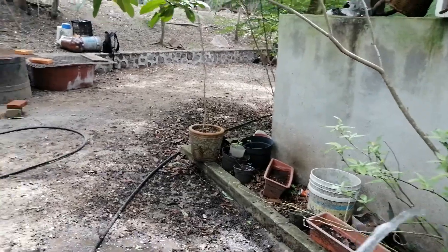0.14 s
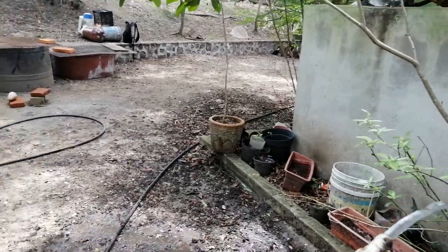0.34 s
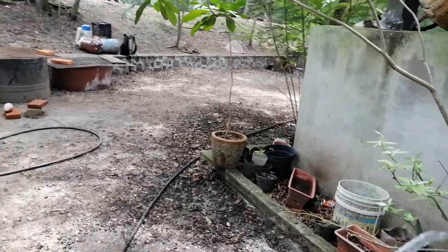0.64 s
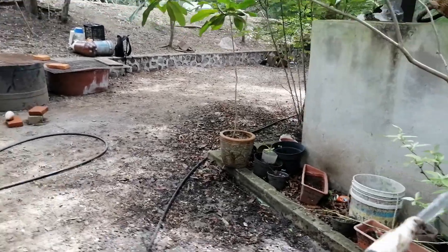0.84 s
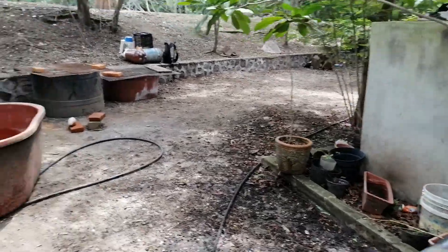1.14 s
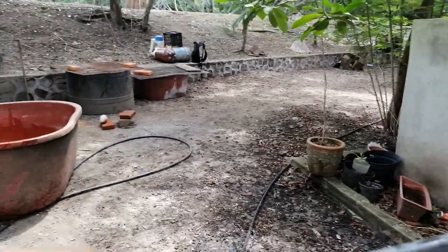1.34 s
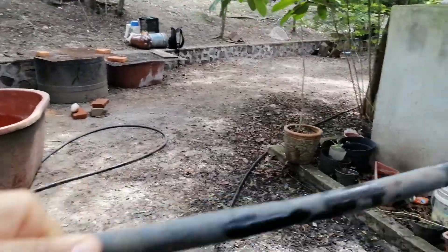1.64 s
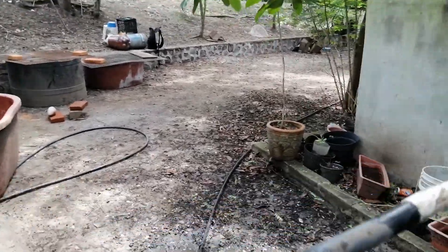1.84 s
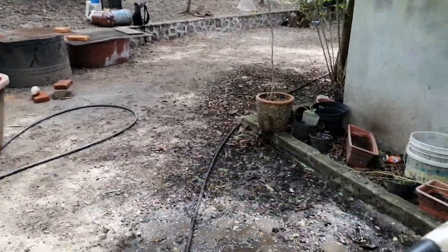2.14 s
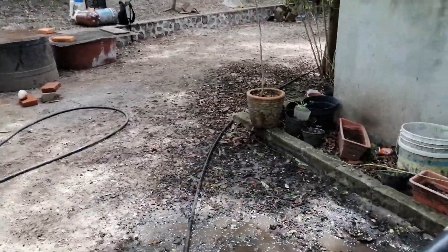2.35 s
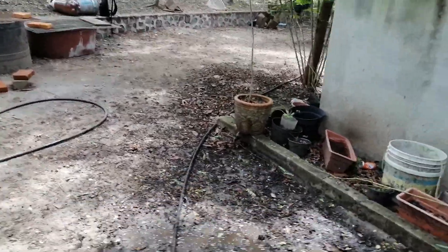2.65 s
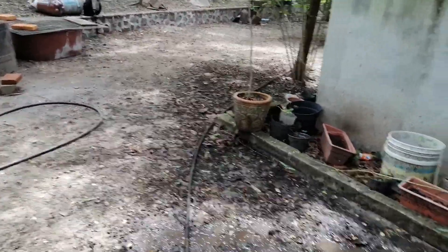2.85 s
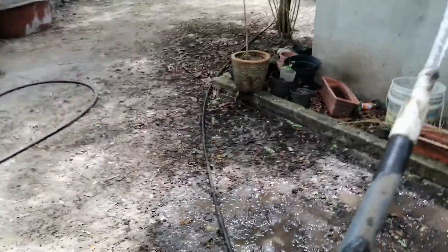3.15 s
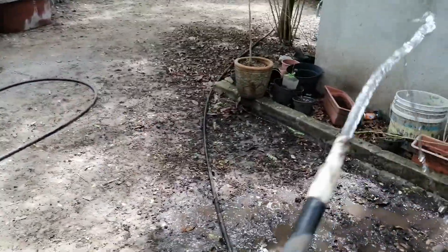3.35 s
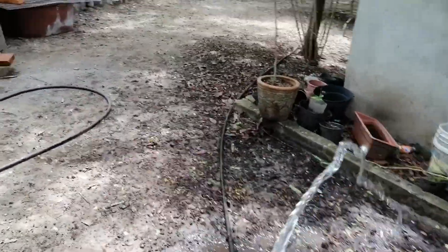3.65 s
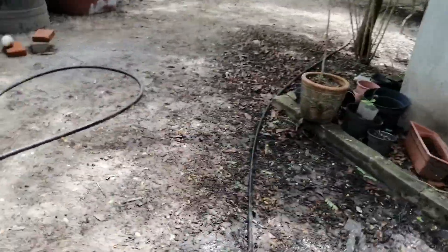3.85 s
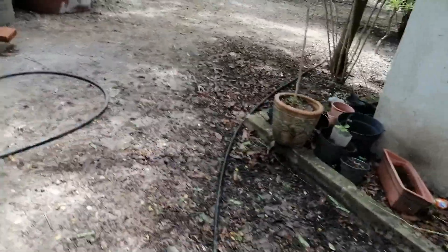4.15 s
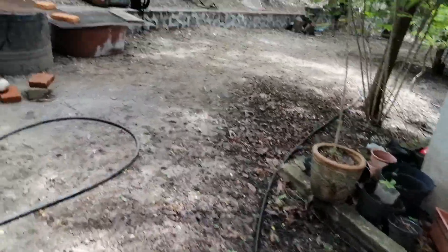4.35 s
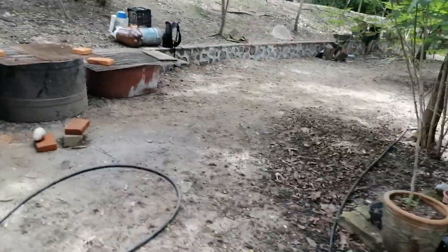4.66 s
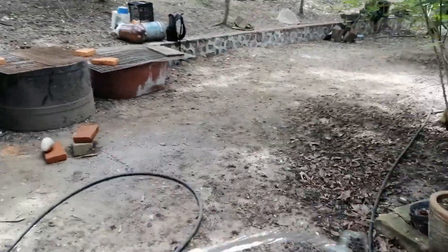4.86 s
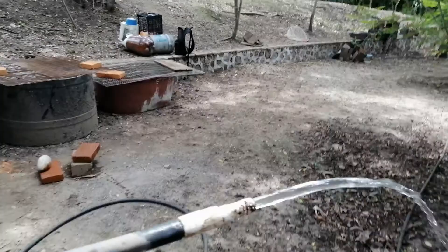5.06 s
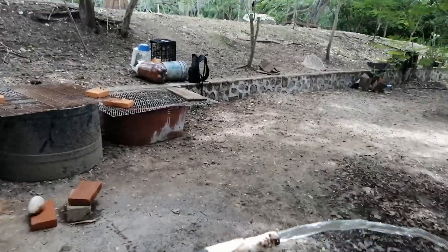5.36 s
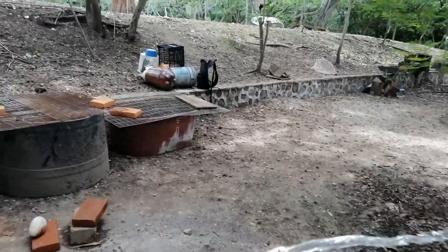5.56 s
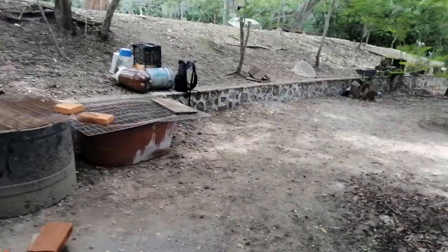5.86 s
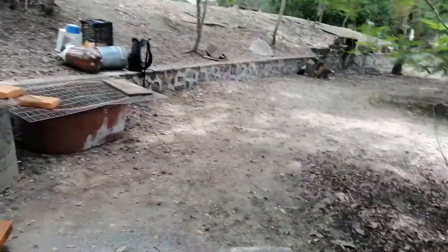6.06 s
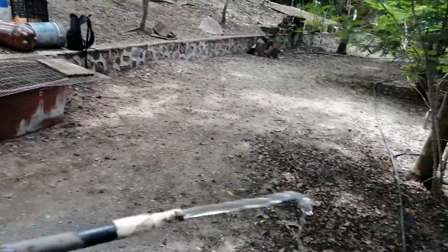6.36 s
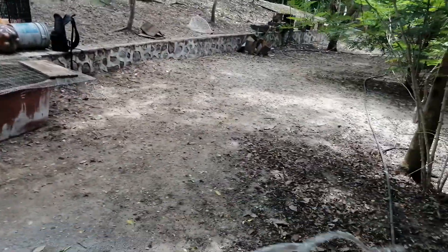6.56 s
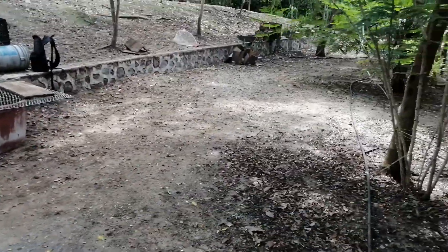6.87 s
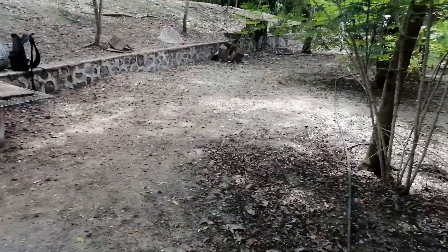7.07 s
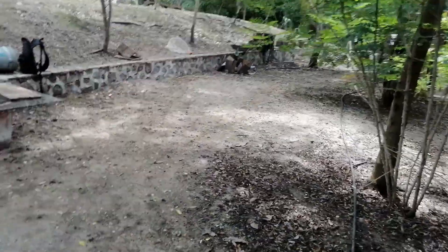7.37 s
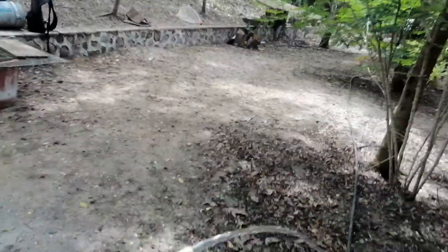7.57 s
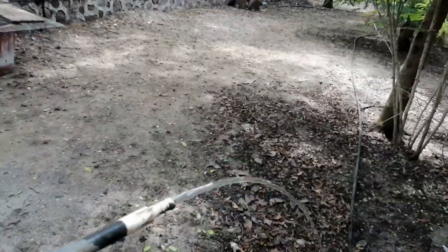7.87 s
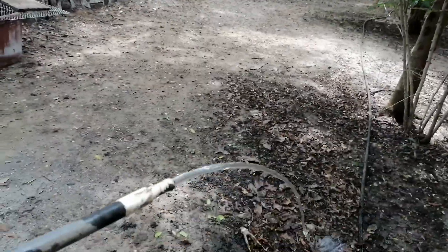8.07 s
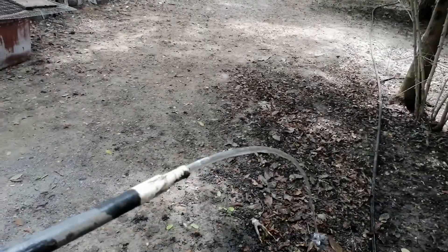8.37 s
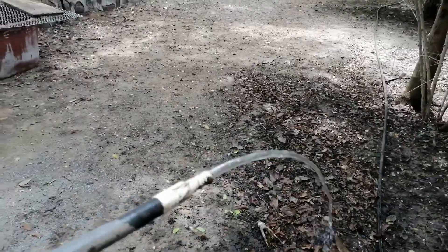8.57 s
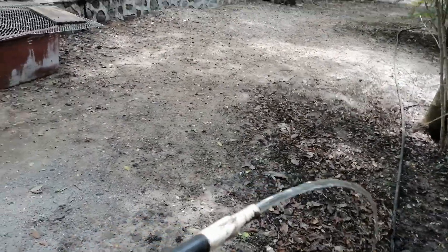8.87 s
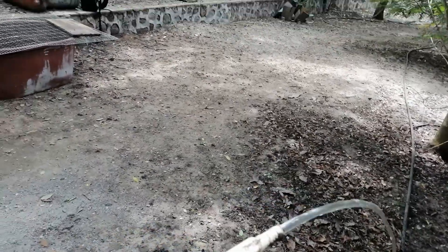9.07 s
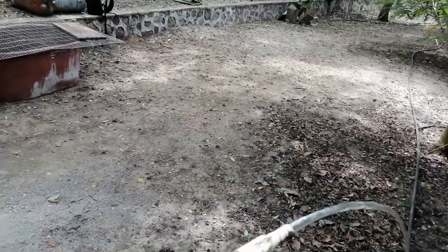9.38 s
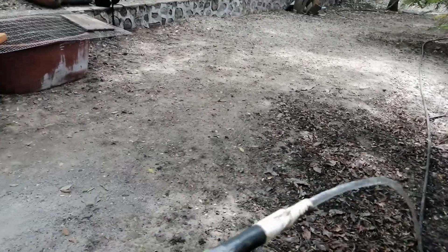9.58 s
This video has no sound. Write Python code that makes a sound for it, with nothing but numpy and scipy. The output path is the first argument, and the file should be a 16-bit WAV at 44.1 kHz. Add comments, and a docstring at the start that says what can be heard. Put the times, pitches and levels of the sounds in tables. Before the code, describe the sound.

Water from a garden hose spatters on packed earth and dry leaves for the whole ten seconds or so: quick, bright, irregular splats and tiny bubbly plips over a fine spray, swelling and thinning with the flow. It lands close by, a little to the right of a phone microphone, with a faint steady outdoor hiss behind. From the start until about 4.3 seconds the hose is dragged in short jerks, giving low rumbles and soft scrapes. It bumps a hollow tub faintly at 1.2 seconds and a little harder at 2.6 and 2.9. At about 5.1 seconds comes a loud, deep, hollow thump on the tub, and at 6.5 a second, slightly higher one with a small rebound; both die away quickly. The splashing is a bit softer in the second half, with occasional faint hose rubs and a light knock near 8.5 seconds.

```python
"""Quick splats of water over a fine spray: a garden hose spills on packed earth and dry leaves.
Each impact gives a puff of noise and traps an air pocket that rings for a few cycles. The hose
rumbles and scrapes by friction as it is dragged, and strikes a hollow tub, twice hard, exciting
its modes. A steady hiss lies behind. The water lands low to the right of a phone, whose two
microphone ports hear it with differences of time and level."""
import sys
import numpy as np
from scipy import signal
from scipy.fft import rfft, irfft, next_fast_len
from scipy.io import wavfile
from scipy.ndimage import uniform_filter1d, map_coordinates

SR = 44100
rng = np.random.default_rng(int(sys.argv[2]) if len(sys.argv) > 2 else 0)


def store_pcm(level_fs):
    """Save levels as 16-bit WAV."""
    pcm = np.round(np.clip(level_fs, -1, 1) * 32767).astype(np.int16)
    wavfile.write(sys.argv[1], SR, np.atleast_2d(pcm).T)


N = 429093

# Band levels of the falling water: time_s, fizz_db, splatter_db, leaf_db, soil_db
STREAM_LEVELS = [(0.0, -57, -52.5, -53.5, -49), (0.35, -54, -53.5, -55.5, -60.5),
                 (0.89, -55, -54.5, -57.5, -60.5), (1.38, -57.5, -57.5, -61, -63.5),
                 (1.75, -54, -55, -52, -59.5), (2.02, -52, -54, -62, -56.5), (2.2, -52, -49.5, -53, -52.5),
                 (2.63, -53.5, -56, -59, -56), (3.0, -56, -58.5, -58, -50.5), (3.3, -52, -51.5, -55.5, -57),
                 (3.48, -55.5, -52.5, -52, -64), (4.04, -50, -49.5, -50.5, -56.5),
                 (4.31, -55.5, -55.5, -56, -66.5), (4.74, -58.5, -61.5, -63.5, -64),
                 (5.2, -57.5, -58.5, -61.5, -62), (5.6, -60, -62, -67.5, -61),
                 (6.15, -59, -57.5, -59.5, -61), (6.64, -61, -66.5, -66, -65), (7.21, -56.5, -55, -56, -62),
                 (7.75, -57.5, -57, -54.5, -63.5), (8.02, -58.5, -54, -58.5, -62),
                 (8.34, -61.5, -65.5, -62.5, -67), (8.89, -60, -61, -57, -57.5),
                 (9.38, -62.5, -53.5, -57, -58), (9.73, -57.5, -58.5, -67, -59)]
# The stream swells or thins briefly: start_s, length_s, fine_swell_db, large_over_fine_db
GUSH_EVENTS = [(0.221, 0.065, 5, 1), (1.11, 0.093, 2, 5), (1.522, 0.1, 1, 1.5), (1.668, 0.1, 1, 0.5),
               (2.19, 0.15, 1, 0.5), (3.221, 0.039, 1.5, 0.5), (3.58, 0.056, -1, 4),
               (3.873, 0.089, 1.5, 4.5), (5.002, 0.092, 4, 2), (4.731, 0.043, 2, 4), (5.28, 0.12, -1.5, 9),
               (5.655, 0.045, 3, 2), (5.845, 0.23, 2, 6.5), (6.263, 0.071, 6.5, -4.5),
               (6.36, 0.046, 6, -6.5), (6.933, 0.13, 5, -1.5), (7.086, 0.031, -10.5, 18),
               (7.137, 0.11, 1, 6.5), (7.243, 0.046, -4, -7), (8.02, 0.16, 3, -6.5), (8.543, 0.08, 4, -1.5),
               (8.77, 0.075, -3, 5), (3.802, 0.033, -7, -1), (4.015, 0.057, -1.5, -2.5),
               (4.058, 0.082, 0.5, 5), (4.19, 0.029, 1, -2), (5.11, 0.1, -2, 1.5), (5.745, 0.044, -2.5, 2),
               (7.875, 0.064, 4, -1), (9.042, 0.046, -3.5, 6), (9.13, 0.073, 1, -2.5),
               (9.208, 0.04, -5, -1), (9.383, 0.075, 6, -2)]
# Prominent single splats: start_s, level_db, pitch_hz, pocket_over_puff_db
SPLAT_EVENTS = [(0.032, -29.5, 5700, 2), (0.2423, -20, 4900, 2), (0.243, -27.5, 695, 7),
                (0.346, -29.5, 800, -4), (0.406, -29, 4720, -6), (0.491, -21, 5750, 5),
                (0.538, -22, 3870, -10), (0.655, -28, 9400, 10), (0.687, -23.5, 9210, 13),
                (0.718, -25, 4690, -1), (0.745, -15.5, 5600, 5), (0.771, -20, 9600, 6),
                (0.782, -23.5, 2270, 2), (0.82, -27, 8930, 12), (0.834, -29, 5930, 6),
                (0.888, -25.5, 3180, -8), (0.956, -28, 9550, 19), (0.966, -17.5, 3850, 0.5),
                (1.024, -26.5, 3000, -6), (1.087, -23.5, 9400, 5), (1.098, -20, 9400, 12),
                (1.112, -27, 1230, 4.5), (1.112, -20.5, 3530, 1), (1.145, -24.5, 5850, 3),
                (1.179, -30, 2430, -2), (1.2136, -22, 3550, 1), (1.23, -23, 4950, -2),
                (1.255, -22, 3760, -7), (1.413, -27, 3500, -5), (1.496, -28, 5470, 3),
                (1.521, -24.5, 3150, 1), (1.562, -32, 5700, 10), (1.588, -25.5, 2900, -2),
                (1.645, -27, 9000, 2), (1.652, -23, 9390, 5), (1.731, -27, 2860, -11),
                (1.7689, -28.5, 3370, -11), (1.87, -24, 10100, 11), (1.893, -29, 2240, 2),
                (1.924, -27, 9500, 12), (1.934, -31, 6000, 4), (1.976, -22, 7900, 6), (1.984, -22, 4560, 7),
                (2.013, -23, 8770, 9), (2.03, -21.5, 7300, 7), (2.063, -31, 8500, 6), (2.091, -27, 6790, 4),
                (2.113, -23, 1970, 1), (2.17, -31, 3200, 1), (2.187, -29, 3400, 2), (2.212, -26, 3400, 6),
                (2.235, -15, 1210, -3.5), (2.244, -22, 2740, -7), (2.298, -33, 5590, -4),
                (2.465, -18.5, 5850, -18), (2.588, -22, 2360, 2), (2.777, -22.5, 2880, -2),
                (2.791, -23, 2350, 5), (2.868, -23.5, 3000, -2), (2.901, -21.5, 9970, 7),
                (2.988, -24.5, 3160, -14), (3.023, -24, 10100, 3), (3.148, -32, 2720, 6),
                (3.159, -18.5, 2600, -5), (3.183, -21, 2620, -21), (3.237, -24.5, 1870, 5),
                (3.256, -21, 4300, -8), (3.62, -21.5, 1330, 1), (3.77, -18, 4100, -9),
                (3.788, -23.5, 5400, -4), (3.82, -22.5, 5200, -3), (3.843, -19, 5700, -17),
                (3.872, -30, 5360, -1), (3.901, -16, 3750, 6), (3.97, -34, 5500, 2), (3.981, -23, 6700, 2),
                (4.036, -28, 5800, 7), (4.051, -27, 5540, 8), (4.11, -29, 1780, 2),
                (4.248, -22.5, 9110, -7), (4.754, -23.5, 670, -23), (5.052, -26.5, 3540, 6),
                (5.293, -22.5, 2750, -5), (5.405, -26.5, 5670, 3), (5.43, -27.5, 3260, -7),
                (5.473, -30, 7100, 3), (5.508, -25, 9530, 5), (5.521, -24.5, 8000, -7),
                (5.575, -29, 5060, 3), (5.604, -31, 6400, 26), (5.659, -21, 2700, 13), (5.68, -29, 2980, 2),
                (5.697, -18, 3170, -9), (5.862, -26, 2580, 0), (5.97, -24.5, 3060, -6),
                (5.993, -32, 5040, 12), (6.159, -29, 5000, -5), (6.31, -23, 6600, 21),
                (6.395, -30, 8500, 8), (6.422, -23.5, 9400, 13), (6.89, -23, 4900, -4),
                (6.934, -17, 4400, -3), (6.987, -21, 9900, 2), (7.015, -37, 1500, 11),
                (7.029, -32.5, 1440, 3), (7.086, -26.5, 2950, 13), (7.088, -33.5, 630, 9),
                (7.095, -29.5, 1330, 12), (7.103, -33.5, 463, 15), (7.131, -19.5, 2570, 5),
                (7.133, -30, 760, 8), (7.179, -31, 5360, -1), (7.186, -29, 3500, -1),
                (7.232, -26.5, 2000, -1), (7.862, -24.5, 3200, 7), (7.9, -29, 3960, 13),
                (7.983, -30, 2980, -1), (8.064, -36, 1520, -0.5), (8.079, -25, 6360, 11),
                (8.091, -29.5, 1880, -5), (8.558, -23, 1990, -4), (8.601, -27, 7060, 10),
                (8.717, -29, 6450, 8), (8.729, -25, 2580, 5), (8.807, -31, 1200, -10),
                (8.832, -28, 2000, 20), (8.988, -36, 1260, 0), (9.056, -33, 2800, 11),
                (9.098, -33, 5500, -1), (9.182, -27, 5500, 0), (9.183, -29, 2170, 11), (9.32, -36, 880, 0),
                (9.44, -31.5, 940, 0), (9.543, -29, 4470, -6), (9.564, -26, 3900, -14),
                (9.645, -40, 4600, 11)]
# Spectra of the water: frequency_hz, relative_density_db
FIZZ_SPECTRUM = [(5200, -55), (6600, 2.5), (8300, -1.5), (9500, 4), (11500, 0), (14500, -22), (15300, -27),
                 (16000, -24)]  # small drops
SPLATTER_SPECTRUM = [(2600, -29), (3500, 3), (4500, 2.5), (5700, 5), (6500, -3), (8000, -101)]  # middle drops
LEAF_SPECTRUM = [(1300, -20), (1900, -7), (2500, 0), (3200, -1), (4300, -41.5)]  # large blobs on dry leaves
SOIL_SPECTRUM = [(300, -21), (600, -7), (900, -7.5), (1500, -2), (2200, -1.5), (3500, -68)]  # wet soil

# Blows on the tub: start_s, level_db, left_over_right_db, contact_hz, ring_db, boom_db,
# rest_after_s (until the hose rests on the tub), slap_db
TUB_BLOWS = [(1.219, -43, 0, 99, -5, 2.5, .3, -14), (2.567, -28, 8, 210, -28, -5.5, .3, -7),
             (2.869, -33, 1, 120, -2, -16, 0.38, -12), (5.043, -42.5, 3, 198, -1, 0, 0.035, -21),
             (5.0746, -4.5, 2.5, 99, -9, -17, .4, -13), (5.522, -44.5, -2, 206, -21, 1.5, 0.32, 2),
             (6.5164, -4, 0.5, 298, -13.5, -11.5, 0.15, -15.5),
             (6.619, -22.5, -1, 374, 0.5, -5, 0.068, -21), (8.51, -39, 3, 292, -7, -10, 0.34, -14),
             (8.516, -35, 9, 620, -16, -20, .3, -12), (8.527, -37, 2, 272, -9, -10, .3, -16)]
# Normal modes of the tub: frequency_hz, level_db, t60_s
TUB_MODES = [(52.2, -4.5, 0.65), (77, -5.5, .38), (97, 4.5, 0.29), (129.4, -3.5, 0.39), (177.8, -5.5, 0.34),
             (211.5, -5, 0.15), (273, -2, 0.11), (300, 0, 0.11), (370, -31, 0.15), (480, 5, 0.074),
             (703, -25, 0.5)]
# Decay of the tub's boom: frequency_hz, t60_s
BOOM_DECAY = [(25, 0.7), (90, 0.79), (200, 0.44), (500, 0.12), (1500, 0.042)]
# The tub's wall under a blow: frequency_hz, relative_density_db
SLAP_SPECTRUM = [(200, -22), (450, -5), (800, 0), (1150, -12), (1600, -16), (2500, -16), (6000, -47)]

# The hose is pulled or shifted: start_s, length_s, rumble_db, scrape_over_rumble_db
HOSE_PULLS = [(-.02, 0.26, -40.5, -9), (0.039, 0.029, -36, -12), (0.283, 0.076, -43.5, -10),
              (0.395, 0.22, -41, -8), (0.627, 0.045, -50, -12), (0.814, 0.1, -55.5, -25),
              (1.146, 0.065, -57, -6), (1.94, 0.11, -55, -15), (2.404, 0.09, -49, -8),
              (2.565, 0.07, -45.5, -5), (2.672, 0.14, -43, -5.5), (2.851, 0.054, -45, -2.5),
              (2.95, 0.21, -49.5, -0.5), (3.128, 0.034, -45, -2), (3.203, 0.11, -53.5, -1),
              (3.622, 0.014, -53.5, -27), (3.74, 0.044, -51, -5), (3.84, 0.15, -58, -3.5),
              (4.02, 0.16, -52.5, -4), (4.15, 0.03, -49.5, -2.5), (4.21, 0.08, -49, -6),
              (5.854, 0.11, -60, 4), (6.031, 0.015, -46, -14), (6.125, 0.043, -46.5, -10.5),
              (6.76, 0.18, -55, -13), (7.06, 0.086, -58, -2), (7.474, 0.052, -64, -5),
              (7.96, 0.12, -62.5, -20), (8.243, 0.019, -66, -22), (8.552, 0.025, -58, -7),
              (9.106, 0.029, -61.5, -17), (9.32, 0.071, -62, -3.5)]
# Spectra of the dragged hose: frequency_hz, relative_density_db
RUMBLE_SPECTRUM = [(35, -33), (60, -22), (75, -15), (135, 5.5), (166, -2), (199, 1.5), (245, -1.5),
                   (300, -2.5), (400, -15.5), (500, -13), (650, -63), (1100, -120)]
SCRAPE_SPECTRUM = [(250, -6), (400, 3.5), (490, -0.5), (600, 3), (700, -0.5), (800, -5), (950, -4),
                   (1300, -19), (2500, -88)]
SUB_BASS_SPECTRUM = [(12, -49), (30, -15), (55, -13), (75, -12.5), (110, -19), (250, -100)]

# Far spray and garden air: frequency_hz, relative_density_db
MIST_SPECTRUM = [(200, -69), (600, -13), (1500, -1.5), (3000, 4.5), (6000, 1), (10000, -5.5),
                 (13000, -1), (15500, -11)]
# Later arrival at the left port: time_s, delay_ms
LEFT_DELAY = [(0, 0.22), (1.5, .32), (3.2, 0.31), (3.8, 0.16), (4.7, 0.11), (5.5, 0.29), (7.2, .2),
              (7.6, 0.12), (8.7, 0.12), (9.73, 0.25)]
# Acoustic shadow of the phone's body: frequency_hz, left_over_right_db
BODY_SHADOW = [(60, -21), (110, -3), (200, -2), (380, -0.5), (700, -3), (1290, 0), (2380, -3), (4400, -4.5),
               (8120, -11), (15000, 10)]

PAN_DB, PAN_DB_PER_MS = 2.5, -14.5  # water further right: the left port is later and weaker
GUSH_RISE_S, GUSH_FALL_S = 0.013, 0.034
THUMP_LEFT_DELAY_MS = 0.4
PULL_RISE_DB_PER_S, PULL_FALL_DB_PER_S = 506, 228
REST_RUMBLE_DB, REST_SCRAPE_DB, REST_SUB_BASS_DB = -67, -72.5, -65  # floors between pulls
SUB_BASS_OVER_RUMBLE_DB = -23
MIST_DB, TOP_HZ = -58, 15800


def water():
    """Impact noise: a broken stream lands in clumps of splats over a spray of tiny drops."""
    fizz_db, splatter_db, leaf_db, soil_db = curves(STREAM_LEVELS)
    fine_db, large_db = gushes()
    clump_db = 0.09 * wobble(99) + wobble(11)
    blobs = patter(count=800, size_db=3, hz=4010, t60=0.018, pocket_db=-4.5)
    bands = [(fizz_db + fine_db, FIZZ_SPECTRUM, 9000, 1.5, 0.9, 0.6, 1.1),
             (splatter_db + (fine_db + large_db) / 2, SPLATTER_SPECTRUM, 4800, 2.5, 0.9, 0.6, 0.9),
             (leaf_db + large_db, LEAF_SPECTRUM, 2700, 3, 1.3, 0.6, 0.7),
             (soil_db + large_db, SOIL_SPECTRUM, 1100, -6, 0.6, 0.9, 0.55)]
    direct, scattered = 0, 0
    for db, spectrum, hz, pocket_db, own_gain, hiss_gain, scatter_gain in bands:
        # every blob sounds in all bands, and each band has drops of its own
        drops = blobs + own_gain * patter(count=1500, size_db=1.5, hz=hz, t60=0.039, pocket_db=pocket_db)
        spray = rng.standard_normal((3, N))
        level = amp(db + clump_db + wobble(40) + 1.1 * wobble(4))
        # ground and leaves scatter the drops differently towards each port
        envelope = uniform_filter1d(np.abs(drops), size=40, origin=19) + hiss_gain
        paths = np.vstack([drops + hiss_gain * spray[0], envelope * spray[1:]])
        band = level * coloured(paths, spectrum)
        direct += band[0]
        scattered += scatter_gain * band[1:]
    splats = prominent_splats()
    delay_ms, = curves(LEFT_DELAY)
    return ports(direct + splats[0], scattered + 0.47 * splats[1:], PAN_DB + PAN_DB_PER_MS * delay_ms)


def impacts(start_s, db, hz, pocket_db, t60, cycles):
    """Bubble resonance: each splat is a dying puff of noise plus a trapped air pocket that rings."""
    t = np.arange(SR // 90) / SR
    start_s, db, hz, pocket_db, t60, cycles = (
        np.asarray(v)[:, None] for v in (start_s, db, hz, pocket_db, t60, cycles))
    octaves = np.log2((np.fft.rfftfreq(len(t), 1 / SR) + 1) / hz)
    near_pitch = 0.57 + np.exp(-(octaves / 1.27) ** 2)  # the noise gathers loosely around the pitch
    noise = rng.standard_normal((len(start_s), len(t)))
    puff = irfft(rfft(noise) * near_pitch, len(t)) * amp(-60 * t / t60)
    pocket = amp(pocket_db) * np.sin(2 * np.pi * hz * t * (1 + 4 * t)) * np.exp(-t * hz / cycles)
    splat = (puff + pocket) * (1 - np.exp(-t / 0.0002))
    splat = amp(db) * splat / np.abs(splat).max(axis=1, keepdims=True)
    samples = np.round(start_s * SR).astype(int) + np.arange(len(t))
    return np.bincount(samples.ravel(), splat.ravel(), N + SR)[:N]


def prominent_splats():
    """Single impacts stand out as transients: one direct and two scattered signals."""
    def response(f):
        notch = 1 - 0.5 * np.exp(-((f - 7600) / 900) ** 2)
        return 0.62 * np.clip(f / 420, 0, 1) ** 2 / (1 + (f / 12500) ** 6) * notch

    start_s, db, hz, pocket_db = np.transpose(SPLAT_EVENTS)
    t60 = np.full(len(start_s), 0.014)
    paths = [impacts(start_s, db, hz, pocket_db, t60, cycles=1.74 + hz / 1800) for _ in range(3)]
    return filtered(np.array(paths), response)


def patter(count, size_db, hz, t60, pocket_db, limit_db=11):
    """Shot noise: splats at random times, few large and many small, at rms 1."""
    when, size = rng.random((count, 2)).T
    pitch, pocket, decay, ring = rng.standard_normal((4, count))
    db = limit_db * np.tanh(-size_db * np.log(1 - size) / limit_db)  # a blob cannot outgrow the stream
    pitch_hz = np.clip(hz * np.exp(0.529 * pitch), 500, 13000)
    return unit(impacts(when * N / SR, db, pitch_hz, pocket_db + 5 * pocket,
                        t60 * np.exp(0.4 * decay), cycles=6 * np.exp(0.5 * ring)))


def gushes():
    """Amplitude modulation by the flow: the swell in dB of fine drops and of large blobs."""
    start_s, length_s, fine_db, large_over_fine_db = np.transpose(GUSH_EVENTS)[:, :, None]
    rise = (moments() - start_s) / GUSH_RISE_S + 1
    fall = (start_s + length_s - moments()) / GUSH_FALL_S + 1
    gate = np.clip(np.minimum(rise, fall), 0, 1)
    return spread((fine_db * gate).sum(0)), spread(((fine_db + large_over_fine_db) * gate).sum(0))


def tub_thumps():
    """Modal excitation: a short push rings the tub's modes near the contact pitch, with boom and slap."""
    def delay_and_lowpass(f):
        phase = np.outer([-0.5, 0.5], 2 * np.pi * f * THUMP_LEFT_DELAY_MS / 1000)
        return np.exp(1j * phase) / (1 + (f / 2200) ** 4)

    out = np.zeros((2, N + SR))
    t = np.arange(SR * 2 // 5) / SR
    mode_hz, mode_db, t60 = np.transpose(TUB_MODES)
    modes = amp(-60 * t / t60[:, None]) * np.sin(2 * np.pi * mode_hz[:, None] * t)
    for start_s, db, pan_db, contact_hz, ring_db, boom_db, rest_after_s, slap_db in TUB_BLOWS:
        cycles = contact_hz * t
        slowing = cycles + 0.38 * (1 - np.exp(-cycles / 0.41))  # the soft hose flattens
        push = -4.4 * np.sin(2 * np.pi * slowing) * cycles ** 1.14 * np.exp(-cycles / 0.47)
        # the level drops once the hose rests on the tub
        damping = 0.53 + 0.27 / (1 + np.exp(np.clip((t - rest_after_s) / 0.0023, -50, 50)))
        struck_db = mode_db + rng.normal(0, 2.2, len(modes)) + rng.normal(0, 1.4, (2, len(modes)))
        ring = -(contact_response(mode_hz, contact_hz) * amp(struck_db)) @ modes
        ring = ring * (1 - np.exp(-t / 0.0064)) * damping
        boom = tub_boom(t, contact_hz) * damping
        blow = push + amp(slap_db) * wall_slap(t)
        blow = blow + amp(ring_db) * ring / np.abs(ring).max() + amp(boom_db) * boom / np.abs(boom).max()
        gains = amp(db + np.array([[0.5], [-0.5]]) * pan_db)
        out[:, round(start_s * SR):][:, :len(t)] += gains * filtered(blow, delay_and_lowpass)
    return out[:, :N]


def contact_response(hz, contact_hz):
    """Band-limited excitation: a soft blow supplies energy mainly around its contact pitch."""
    return 1 / np.sqrt(1 + (0.22 * contact_hz / (hz + 1)) ** 4) / (1 + (hz / (1.86 * contact_hz)) ** 3)


def tub_boom(t, contact_hz):
    """Frequency-dependent decay: noise in the hollow tub dies sooner in the treble than in the bass."""
    hz, time_s, spectra = signal.stft(rng.standard_normal((3, len(t))), SR, nperseg=512)
    decay = amp(-60 * time_s / along(BOOM_DECAY, hz)[:, None])
    spectra *= contact_response(hz, contact_hz)[:, None] * decay
    boom = signal.istft(spectra, SR, nperseg=512)[1][:, :len(t)]
    return (boom[0] + 0.5 * boom[1:]) * (1 - np.exp(-t / 0.005))


def wall_slap(t):
    """Two-stage decay: the tub's wall gives a brief slap, then a faint rattle."""
    noise = coloured(rng.standard_normal((2, len(t))), SLAP_SPECTRUM)
    attack = (1 - np.exp(-t / 0.0015)) ** 2
    return noise * attack * (amp(-60 * t / 0.016) + amp(-29.5 - 60 * t / 0.99))


def hose_drag():
    """Sliding friction: the hose scrapes the ground in jerks; each pull rises, holds and dies away."""
    start_s, length_s, db, scrape_db = np.transpose(HOSE_PULLS)[:, :, None]
    rise_db = PULL_RISE_DB_PER_S * (moments() - start_s)
    fall_db = PULL_FALL_DB_PER_S * (start_s + length_s - moments())
    pull_power = amp(db + np.minimum(0, np.minimum(rise_db, fall_db))) ** 2
    rumble_power = spread(pull_power.sum(0))
    scrape_power = spread((amp(scrape_db) ** 2 * pull_power).sum(0))
    sub_bass_power = amp(SUB_BASS_OVER_RUMBLE_DB) ** 2 * rumble_power
    jerks = amp(2 * wobble(40) + 0.62 * wobble(120) + 0.28 * wobble(7.6))

    def friction(power, rest_db, spectrum, paths):
        level = np.sqrt(power + amp(rest_db + 2 * wobble(5.3)) ** 2)
        noise = coloured(jerks * rng.standard_normal((paths, N)), spectrum)
        return level * wandering_resonances(noise, depth_db=2)

    rumble = friction(rumble_power, REST_RUMBLE_DB, RUMBLE_SPECTRUM, paths=3)
    scrape = friction(scrape_power, REST_SCRAPE_DB, SCRAPE_SPECTRUM, paths=3)
    sub_bass = friction(sub_bass_power, REST_SUB_BASS_DB, SUB_BASS_SPECTRUM, paths=1)
    rubbing = rumble + scrape
    return ports(rubbing[0] + rub_tone(), 0.48 * rubbing[1:], pan_db=2.3) + sub_bass


def wandering_resonances(x, depth_db):
    """Spectral modulation: short-lived peaks wander through a rubbing noise, at rms 1."""
    spectra = signal.stft(x, nperseg=2048)[2]
    field = uniform_filter1d(rng.standard_normal(spectra.shape[1:]), size=2, axis=0)
    field = uniform_filter1d(field, size=3, axis=1)
    return unit(signal.istft(spectra * amp(depth_db * unit(field)), nperseg=2048)[1][:, :N])


def rub_tone(start_s=2.57, length_s=0.25, pitch_hz=603, half_width_hz=14, level_db=-55):
    """A narrow resonance driven by noise sings during one rub of the hose."""
    inside_s = np.minimum(moments() - start_s, start_s + length_s - moments())
    gate = spread(np.clip(inside_s / 0.02, 0, 1))
    tone = filtered(rng.standard_normal(N), lambda f: 1 / (1 + ((f - pitch_hz) / half_width_hz) ** 2))
    return amp(level_db) * gate * unit(tone)


def mist():
    """Diffuse noise: far spray and garden air hiss steadily, uncorrelated at the two ports."""
    return amp(MIST_DB) * coloured(rng.standard_normal((2, N)), MIST_SPECTRUM)


def ports(direct, scattered, pan_db):
    """Path difference and shadowing: direct sound reaches the left port later; each adds its scatter."""
    delay_ms, = curves(LEFT_DELAY)
    late = map_coordinates(direct, [np.arange(N) - delay_ms * SR / 1000], order=3)
    pair = np.array([late, direct]) + scattered
    pair = filtered(pair, lambda hz: amp(np.outer([0.5, -0.5], along(BODY_SHADOW, hz))))
    return pair * amp(np.array([[0.5], [-0.5]]) * pan_db)


def coloured(x, spectrum):
    """Minimum-phase filtering: x takes the spectrum and rings only after each impulse, at rms 1."""
    grid_hz = np.fft.rfftfreq(4096, 1 / SR)
    cepstrum = irfft(np.log(amp(np.maximum(along(spectrum, grid_hz), -70))))
    phase = rfft(cepstrum[:2048] * np.r_[1, np.full(2047, 2)], 4096).imag
    response = lambda hz: amp(along(spectrum, hz)) * np.exp(1j * np.interp(hz, grid_hz, phase))
    return unit(filtered(x, response))


def filtered(x, response):
    """Linear filtering: the spectrum of x times a frequency response."""
    n = x.shape[-1]
    padded = next_fast_len(n + SR // 4)
    return irfft(rfft(x, padded) * response(np.fft.rfftfreq(padded, 1 / SR)), padded)[..., :n]


def wobble(rate):
    """A smooth random curve with rate knots a second."""
    knots = rng.standard_normal(int(N * rate / SR) + 4)
    return spread(map_coordinates(knots, [moments() * rate]))


def curves(rows):
    """Each column after the time, interpolated to one value per sample."""
    time_s, *columns = np.transpose(rows)
    return [np.interp(np.arange(N) / SR, time_s, column) for column in columns]


def along(points, hz):
    """Interpolation of (frequency_hz, value) points on a logarithmic frequency axis."""
    point_hz, values = np.transpose(points)
    return np.interp(np.log(hz + 1), np.log(point_hz + 1), values)


def moments():
    """Times in seconds, a millisecond apart."""
    return np.arange(1000 * N // SR + 2) / 1000


def spread(values):
    """Millisecond values interpolated to one per sample."""
    return np.interp(np.arange(N) / SR, moments(), values)


def amp(db):
    """Amplitude ratio of a level in dB."""
    return np.exp(np.asarray(db) * (np.log(10) / 20))


def unit(x):
    """Normalisation to rms 1."""
    return x / np.sqrt(np.mean(x ** 2) + 1e-20)


def scene():
    """Superposition of water, mist, hose and tub."""
    return water() + mist() + hose_drag() + tub_thumps()


def record(dry):
    """Band limiting: the phone passes nothing above TOP_HZ."""
    return filtered(dry, lambda hz: hz < TOP_HZ)


dry = scene()
out = record(dry)
store_pcm(out)
```